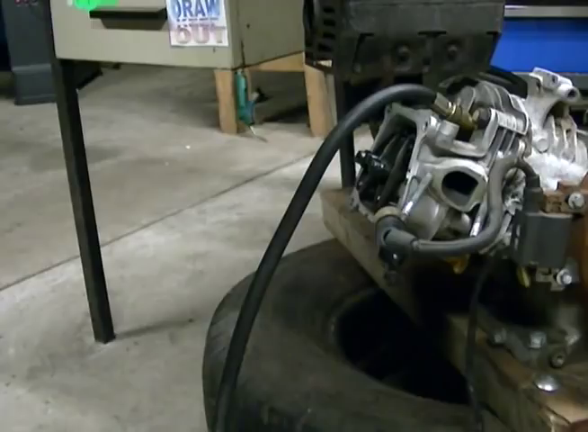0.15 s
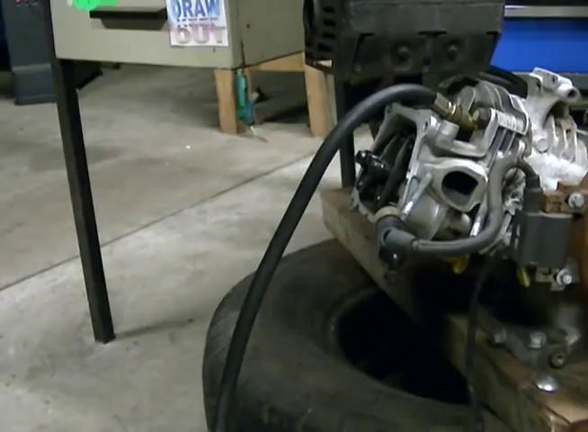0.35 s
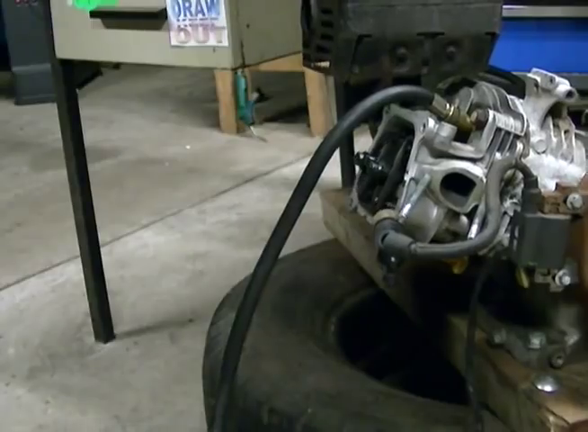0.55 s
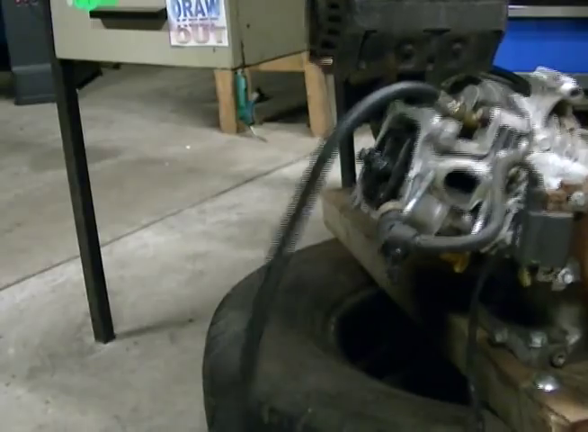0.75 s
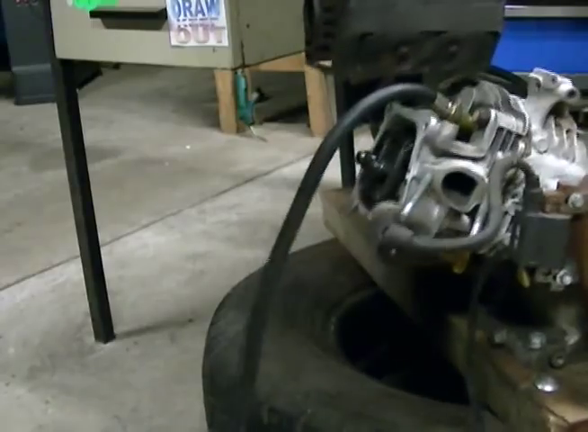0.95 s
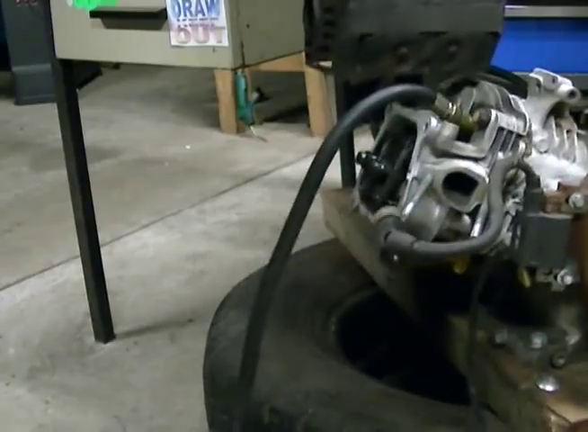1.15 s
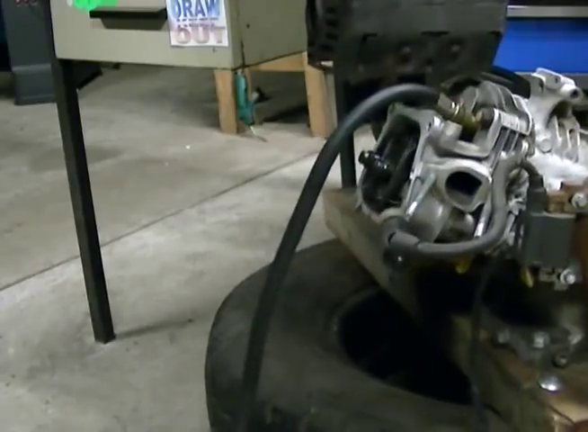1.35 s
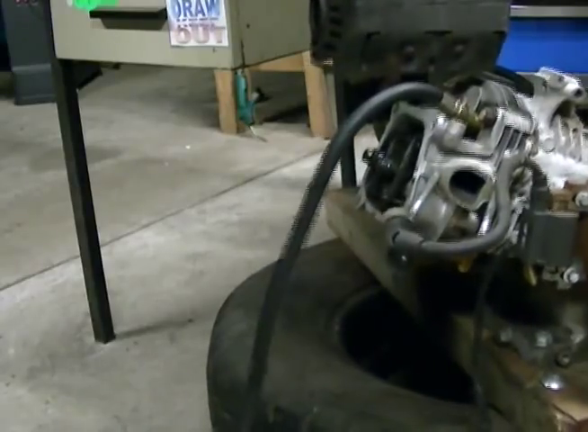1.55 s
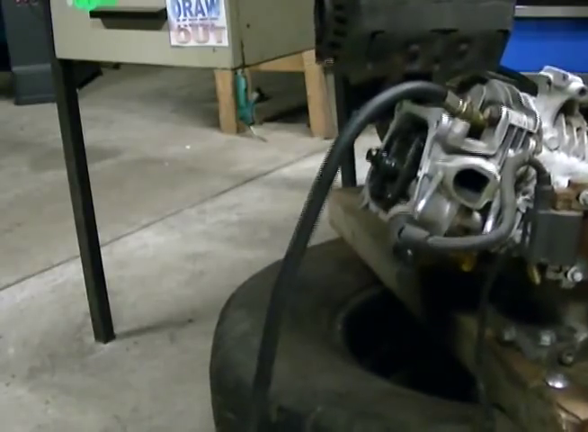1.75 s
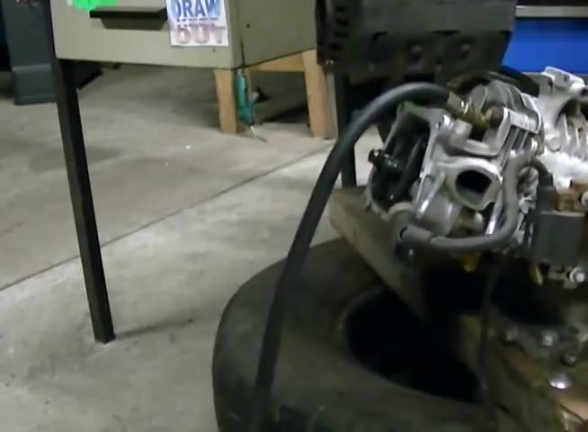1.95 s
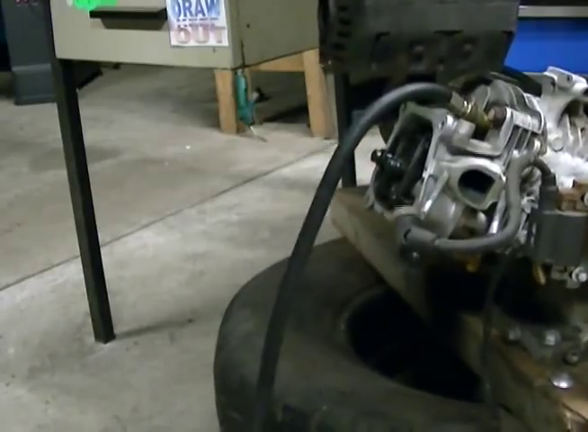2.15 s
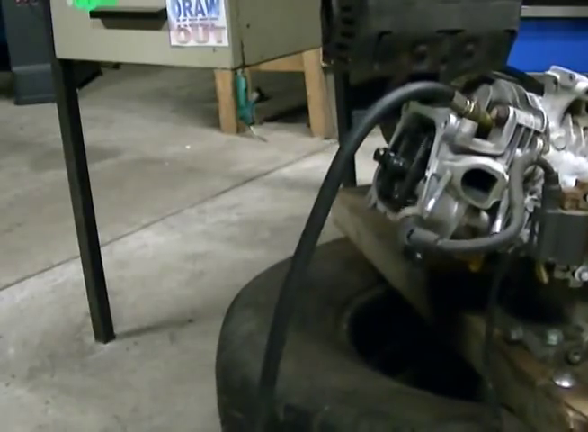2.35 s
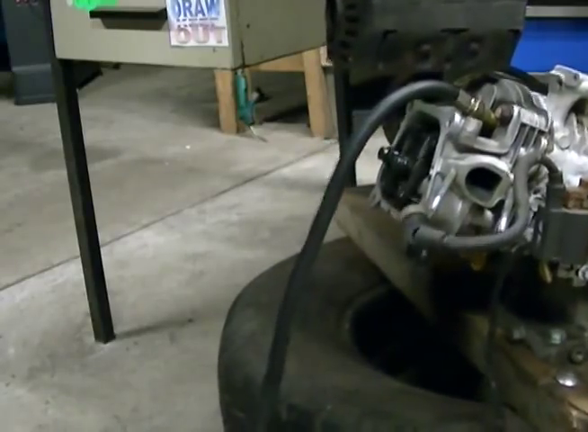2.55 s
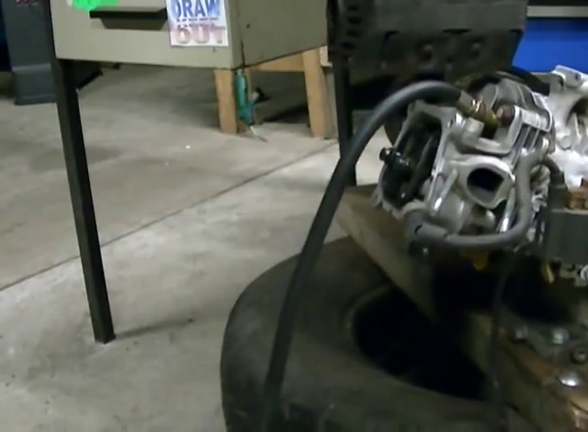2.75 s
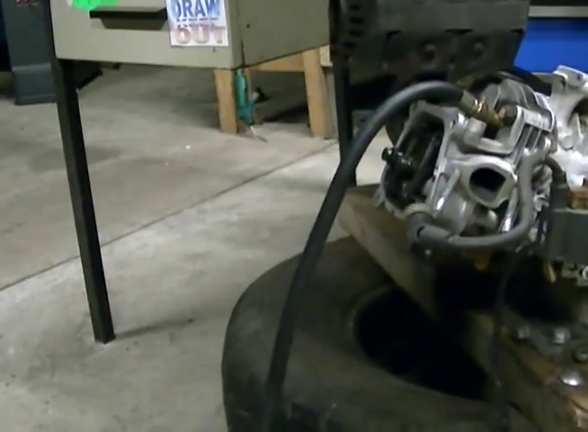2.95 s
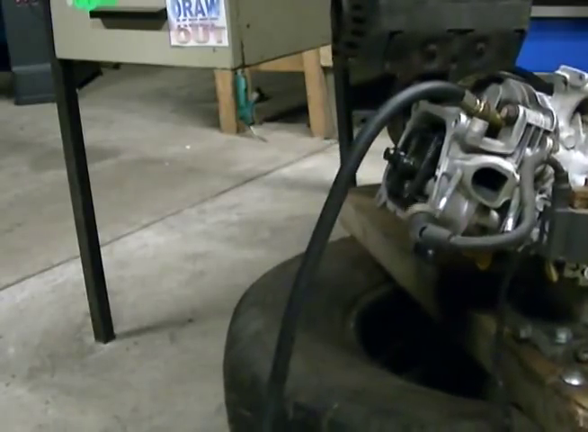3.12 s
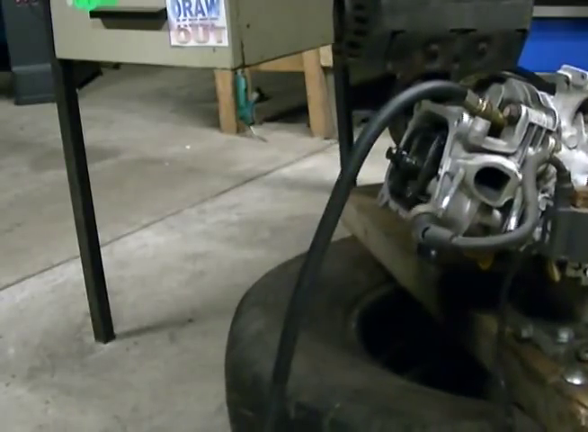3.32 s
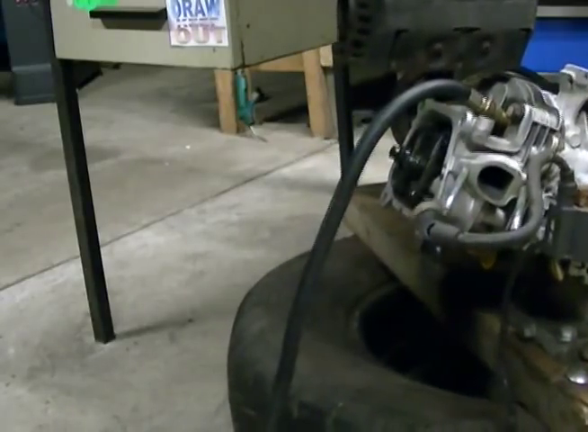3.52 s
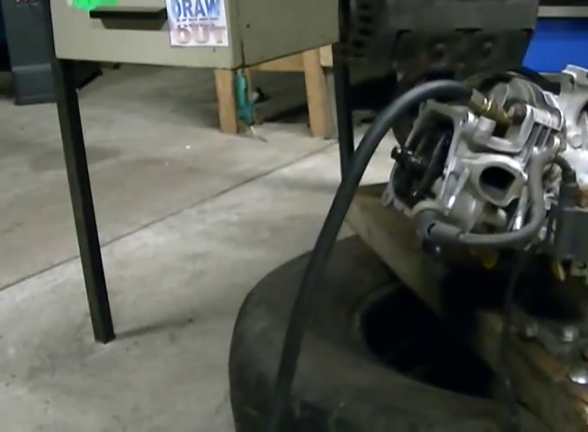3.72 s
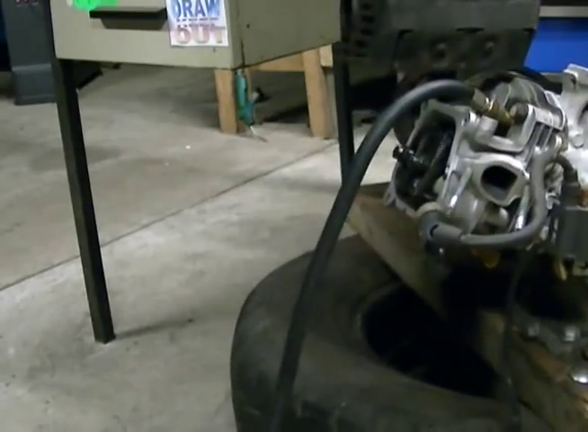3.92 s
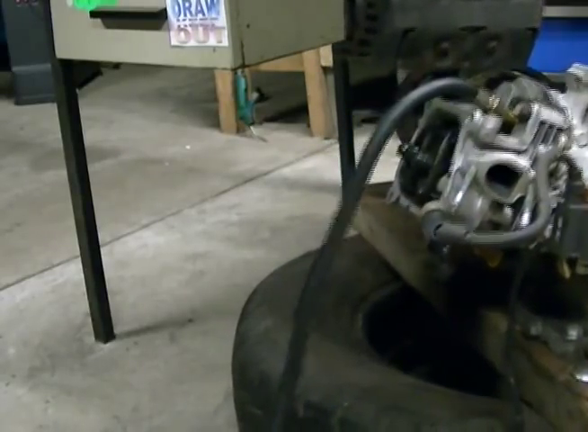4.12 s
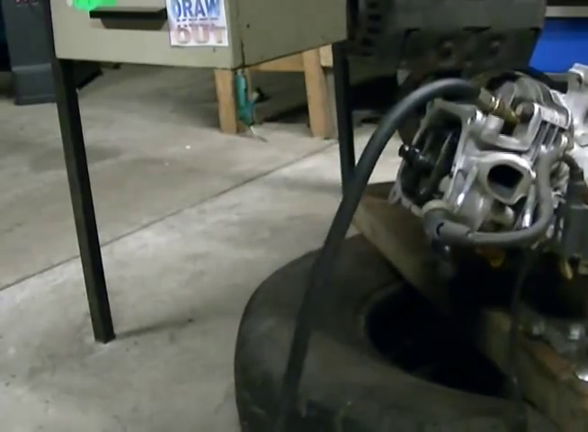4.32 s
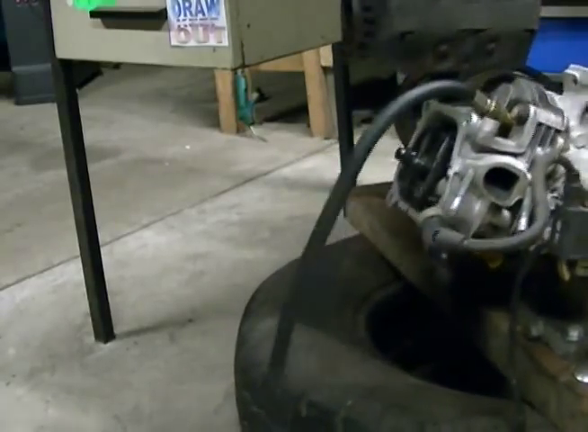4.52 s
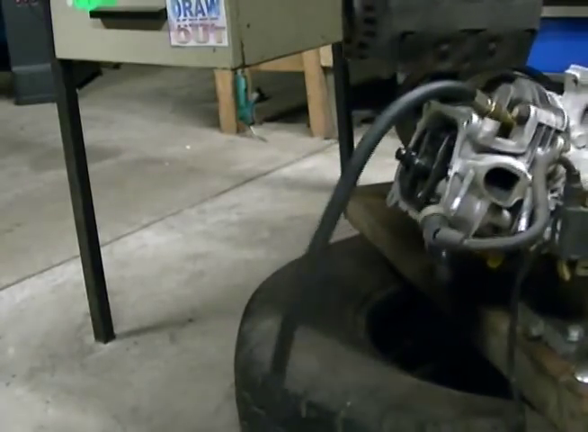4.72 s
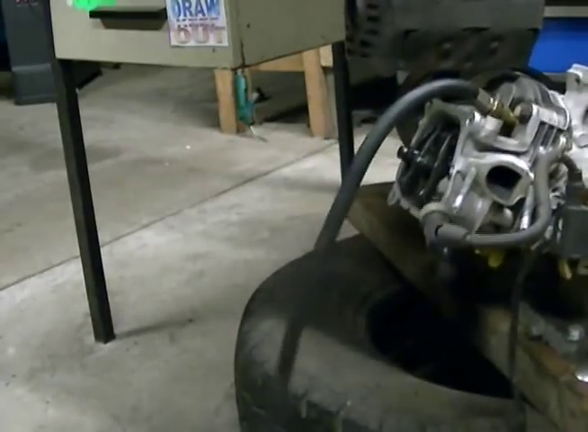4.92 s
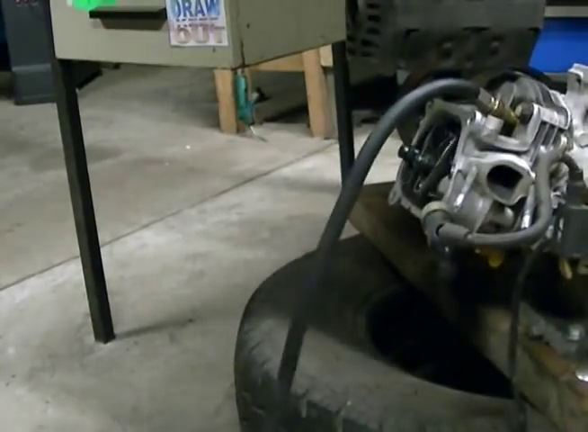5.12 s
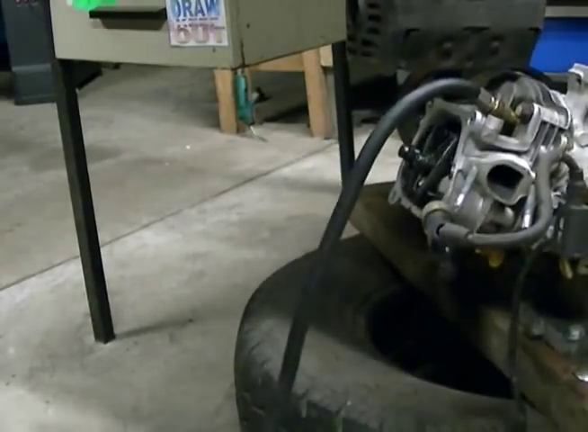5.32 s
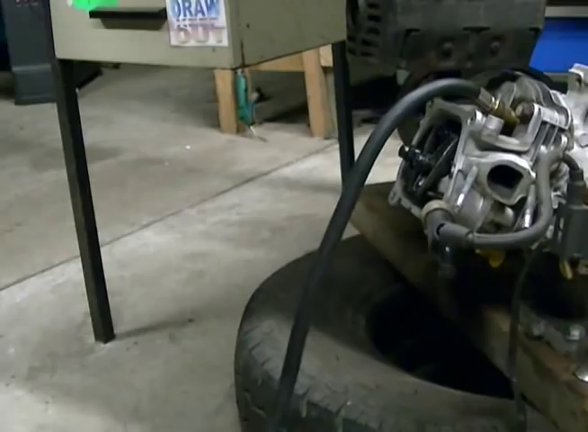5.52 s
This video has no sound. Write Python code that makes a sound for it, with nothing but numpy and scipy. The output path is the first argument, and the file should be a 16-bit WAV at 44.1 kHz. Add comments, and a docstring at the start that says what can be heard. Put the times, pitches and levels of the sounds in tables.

```python
"""In a workshop, an electric starter cranks a small single-cylinder engine that never fires.
The turning crank times it all: noise swells for gear rasp, struck resonances for knock and valve clacks,
wavering tones for squeaks, body hum and air throbs, and coloured noise for the rush through the ports.
The starter is released, the crank coasts against compression, and loose gears clunk to rest as noise
cracks and ringing sines. Metal sounds get a short room tail; a faint room tone lies under everything."""
import sys
import numpy as np
from scipy import signal
from scipy.fft import rfft, irfft, next_fast_len
from scipy.io import wavfile

SR = 44100
rng = np.random.default_rng(int(sys.argv[2]) if len(sys.argv) > 2 else 0)


def waveform_to_disk(signal):
    """Save audio, clipped to [-1, 1], as 16-bit WAV at the path in sys.argv[1]."""
    frames = np.transpose(np.atleast_2d(signal))
    scaled = np.clip(frames, -1, 1) * 32767
    samples = np.round(scaled).astype(np.int16)
    wavfile.write(sys.argv[1], SR, samples)


N = 249849
TIME = np.arange(N) / SR


def amp(db):
    """Turn decibels into a linear factor."""
    return 10 ** (np.asarray(db) / 20)


def unit(x):
    """Scale to rms 1."""
    return x / np.sqrt(np.mean(x ** 2) + 1e-20)


def hump(x, centre, width):
    """Bell-shaped swell of height 1."""
    return np.exp(-.5 * ((x - centre) / width) ** 2)


def each_cycle(cycles, share, width):
    """A swell that comes back at the same crank angle."""
    return hump((cycles - share + .5) % 1, 0.5006, width)


def passing(cycles, share):
    """Times at which the crank passes a point (or points) of its cycle."""
    points = np.add.outer(np.arange(np.ceil(cycles[-1])), share).ravel()
    # points never reached land beyond the end
    return np.interp(points, cycles, TIME, right=2 * N / SR)


def wander(rate):
    """Random drift of spread 1, with `rate` new values a second."""
    return unit(np.interp(TIME * rate, np.arange(N // 20), rng.standard_normal(N // 20)))


def clicks(times, sizes):
    """Single-sample blows; those after the end are dropped."""
    samples = np.round(np.asarray(times) * SR).astype(int)
    return np.bincount(np.clip(samples, 0, N), sizes * np.ones(len(times)), N)[:N]


def bursts(blows, t60):
    """Loudness of the chatter after each blow; its energy equals the blow's."""
    r = np.exp(-2 * np.log(1000) / (t60 * SR))
    return np.sqrt(signal.lfilter([1 - r], [1, -r], blows ** 2 + 1e-18))


def colour(x, spectrum):
    """Shape by a smooth spectrum, keeping the power of white noise."""
    hz, db = np.transpose(spectrum)
    size = next_fast_len(len(x) + 2048)
    grid = np.maximum(np.fft.rfftfreq(size, 1 / SR), 1)
    gain = unit(amp(np.interp(np.log(grid), np.log(hz), db)))
    return irfft(rfft(x, size) * gain, size)[:len(x)]


def resonate(x, hz, width_hz):
    """Band-pass resonance with gain 1 on top."""
    r = np.exp(-np.pi * width_hz / SR)
    zeros = np.array([1, 0, -1]) * (1 - r * r) / 2
    poles = [1, -2 * r * np.cos(2 * np.pi * hz / SR), r * r]
    return signal.lfilter(zeros, poles, x + 1e-18)


def ring(x, hz, t60):
    """A unit click sets a dying sine of starting height 1 ringing."""
    r = np.exp(-np.log(1000) / (t60 * SR))
    w = 2 * np.pi * hz / SR
    return signal.lfilter([0, np.sin(w)], [1, -2 * r * np.cos(w), r * r], x + 1e-18)


def swells(cycles, rows, waver, chance_db):
    """Wavering tones that come back at the same crank angle."""
    out = np.zeros(N)
    for share, length, hz, db in rows:
        pitch = hz * (1 + waver * wander(250))
        tone = np.sin(2 * np.pi * np.cumsum(pitch) / SR)
        out += amp(db + chance_db * wander(7)) * each_cycle(cycles, share, length) * tone
    return out


# quiet of the room, shape only: (f/Hz, relative level/dB)
ROOM_TONE_SPECTRUM = [(18, -90), (30, -52), (108, -30), (126, -16.5), (144, -11.5), (182, -18.5),
                      (230, -13.5), (561, -13.5), (874, -16.5), (1360, -20.5), (15500, -33.5)]


def room_tone():
    """Steady noise with a low bulge is the quiet of the workshop."""
    return amp(-60) * colour(rng.standard_normal(N), ROOM_TONE_SPECTRUM)


# the starter spins the crank up towards its top speed (cycles per s)
START_S, START_SPEED, TOP_SPEED, SPIN_UP_S = .437, 2.319, 6.439, .609
RELEASE_S, COAST_S = 4.007, .793   # once released, friction slows the crank evenly
START_ANGLE = -.223   # cycles before the first knock
# compression holds the slow crank back, or springs it forward (negative):
# (t/s, width/s, share of speed lost)
COMPRESSION_SAGS = [(.585, .025, -.37), (.74, .075, .453), (4.162, .024, .227)]


def crank():
    """Engine cycles turned since the first knock, and speed as a share of the top speed."""
    spin_up = TOP_SPEED - (TOP_SPEED - START_SPEED) * np.exp(-(TIME - START_S) / SPIN_UP_S)
    coast = np.clip(1 - (TIME - RELEASE_S) / COAST_S, 0, 1)
    held_back = 1 - sum(lost * hump(TIME, s, width) for s, width, lost in COMPRESSION_SAGS)
    speed = (TIME > START_S) * spin_up * coast * held_back
    return START_ANGLE + np.cumsum(speed) / SR, speed / TOP_SPEED


# blows of gears and loose parts at start and stop, before the trims in clunks():
# (t/s, body level/dB, sharp edge level/dB)
CLUNK_BLOWS = [(0.1, -45, -64), (0.438, -11.5, -36), (0.516, -5.5, -12.5), (4.489, -4.5, -43),
               (4.505, -13, -41), (4.52, -12, -28), (4.554, -13, -25), (4.566, -17, -46),
               (4.598, -16, -16.5), (4.885, -15, -52), (4.961, -6.5, -26), (5.153, -29, -35.5),
               (5.31, -34.5, -66.5), (5.583, -36, -47), (5.64, -31, -48)]
# colour of the crack, shape only: (f/Hz, relative level/dB)
CRACK_SPECTRUM = [(59, -69), (100, -46), (570, -15), (748, -4.5), (1460, -11), (1700, -10), (2000, -13.5),
                  (2470, -7.5), (4450, -20), (11400, -41.5), (15000, -60)]
# ringing of the steel gears: (f/Hz, relative level/dB, decay time t60/s)
GEAR_RINGS = [(735, -14.5, .33), (1313, -7.5, 0.45), (1694, -4, 0.35), (2250, -14, 0.43), (2500, 0.5, 0.19),
              (2580, -24, .38), (2920, -7, 0.35), (4100, -15.5, 0.12), (4430, -6, 0.22), (5740, -18, 0.26)]
# colour of sliding metal, also used by gears(), shape only: (f/Hz, relative level/dB)
SLIDING_SPECTRUM = [(500, -34.5), (1500, -8.5), (3500, -3), (5000, -4), (6300, -2.5), (8500, -5.5),
                    (12000, -8.5), (14000, -15.5), (15700, -30.5)]


def clunks(crack_db=11, ring_db=-24, body_db=2, sharp_db=8, rebound_s=0.0051, rebound_db=2,
           crack_t60=0.064, edge_t60=0.06, shudder_db=-10, shudder_t60=0.9):
    """Backlash blows: a short crack, a longer shudder, and the steel gears ring on; heavy blows rebound."""
    s, db, edge_db = np.transpose(CLUNK_BLOWS)
    size = amp(db + body_db)
    # squared size: heavy blows rebound far more than light ones
    blows = clicks(s, size) + clicks(s + rebound_s, amp(rebound_db) * size ** 2)
    loudness = bursts(blows, crack_t60) + amp(shudder_db) * bursts(blows, shudder_t60)
    body = loudness * rng.standard_normal(N)
    edge = bursts(clicks(s, amp(edge_db + sharp_db)), edge_t60) * rng.standard_normal(N)
    edge = signal.sosfilt(signal.butter(2, 4500, "high", fs=SR, output="sos"), edge)
    crack = colour(body, CRACK_SPECTRUM) + colour(edge, SLIDING_SPECTRUM)
    rings = sum(amp(mode_db) * ring(clicks(s, size), hz, t60) for hz, mode_db, t60 in GEAR_RINGS)
    return amp(crack_db) * crack + amp(ring_db) * rings


DRIVEN_POWER, COAST_POWER = 0.62, 1.24   # gear force grows as a power of speed, under power and coasting
BITE_S, FREE_SPIN_DB = 0.56, -8   # the pinion whirrs lightly until it bites
# teeth bear harder or go slack as the slow crank fights compression: (t/s, width/s, level change/dB)
TOOTH_STRAINS = [(.64, 0.0099, 3.5), (.72, 0.019, -7.5), (4.215, 0.038, 2), (4.41, 0.013, -4.5),
                 (4.448, 0.015, -1.5)]


def gear_force(speed):
    """Force on the teeth follows speed: light before the pinion bites, fading sooner after release."""
    power = np.where(TIME < RELEASE_S, DRIVEN_POWER, COAST_POWER)
    strain_db = sum(db * hump(TIME, s, width) for s, width, db in TOOTH_STRAINS)
    return speed ** power * amp(FREE_SPIN_DB * (TIME < BITE_S) + strain_db)


def teeth(cycles, count, uneven_db, chance_db, t60, repeat=0.7):
    """Worn teeth strike in the same uneven pattern every cycle, each with a short chatter; rms 1."""
    spacing = np.arange(count) + rng.uniform(-.4, .4, count)
    times = passing(cycles, spacing / count)
    wear = np.resize(rng.permutation(np.linspace(-1.7, 1.7, count)), len(times))
    strikes = clicks(times, amp(uneven_db * wear + chance_db * rng.standard_normal(len(times))))
    # part of the grain comes back in each cycle, as the same surfaces meet again
    since_knock = np.arange(N) - np.searchsorted(cycles, np.floor(cycles))
    grain = repeat * rng.standard_normal(N)[since_knock] + rng.standard_normal(N)
    return unit(bursts(strikes, t60) * grain)


# load surges in each cycle: (share of cycle, width/cycles, rattle level/dB, slide level/dB), both relative
LOAD_SURGES = [(.98, 0.028, 3.5, 5), (.07, .04, 1, -7), (.19, 0.034, 1.5, 2.5), (0.408, 0.029, -0.5, -4),
               (.478, 0.055, -11.5, 7.5), (.695, 0.039, 3, 4)]
SLACK_RATTLE_DB, SLACK_HISS_DB = -5.5, -13.5   # relative levels between the surges
# colour of the tooth rattle, also used by rubbing(), shape only: (f/Hz, relative level/dB)
TOOTH_SPECTRUM = [(30, -32.5), (100, -23), (280, -20), (460, -13), (650, -1.5), (1200, 0), (1850, -4.5),
                  (2300, -1), (4300, -3), (5000, -11), (6500, -8), (10000, -15), (15500, -48)]


def gears(cycles, drive, teeth_db=-20, grind_db=-24.0, hiss_db=-26, ticks_db=-25,
          flicker_db=0.84, hiss_growth=1.9):
    """Teeth strike and slide as hard as the load demands; hiss grows faster with force than rattle."""
    rattle, slide = amp(SLACK_RATTLE_DB), amp(SLACK_HISS_DB)
    for share, width, rattle_db, slide_db in LOAD_SURGES:
        surge = each_cycle(cycles, share, width)
        rattle = np.hypot(rattle, amp(rattle_db) * surge)
        slide = np.hypot(slide, amp(slide_db) * surge)
    rattle, slide = drive * rattle, drive ** hiss_growth * slide
    strikes = amp(teeth_db) * teeth(cycles, count=132, uneven_db=2.5, chance_db=2, t60=0.014)
    ticks = amp(ticks_db) * teeth(cycles, count=60, uneven_db=-2.5, chance_db=5.5, t60=0.058)
    grind = amp(grind_db) * rng.standard_normal(N) * amp(flicker_db * wander(500))
    hiss = amp(hiss_db) * rng.standard_normal(N) * amp(flicker_db * wander(810))
    rasp = colour((strikes + grind) * rattle, TOOTH_SPECTRUM)
    return rasp + colour((hiss + ticks) * slide, SLIDING_SPECTRUM)


# resonances of the engine casing: (f/Hz, width/Hz, level/dB against the direct sound)
CASING_MODES = [(546, 27, -2), (598, 21, -9), (787, 33, -5.5), (984, 100, -8.5), (1314, 46, -7),
                (1500, 83, -2.5), (1684, 38, 3.5), (2340, 118, 1), (2946, 93, -15.5), (2990, 77, -3),
                (3610, 42, -6), (3910, 100, -12), (4257, 114, 0), (5760, 100, 1.5), (6200, 120, -8),
                (7140, 120, -26)]


def casing(x):
    """The casting lifts its own resonances out of whatever shakes it."""
    return x + sum(amp(db) * resonate(x, hz, width) for hz, width, db in CASING_MODES)


SINGING_DB, SINGING_POWER = 1.5, 1.5   # trim on squeaks and hum, and extra growth with speed
# rubbing parts sing briefly, and the engine body hums long and low near 531 Hz:
# (share of cycle, width/cycles, f/Hz, relative level/dB)
SQUEAK_AND_HUM_TONES = [(.1, 0.022, 2080, -12), (.12, .04, 3940, -26), (.43, 0.044, 4340, -30),
                        (.68, 0.18, 531, -31.5)]


def squeaks_and_hum(cycles, speed, vigour):
    """Rubbing parts sing briefly and the body hums longer and lower: wavering sines at fixed crank angles."""
    level = amp(SINGING_DB) * vigour * speed ** SINGING_POWER
    return level * swells(cycles, SQUEAK_AND_HUM_TONES, waver=.013, chance_db=3.0)


PORT_LEAK_DB, AIR_POWER = -49, 2.14   # flow between the gusts before the speed factor, and growth with speed
# gas rushes through the open ports twice a cycle: (share of cycle, width/cycles, level/dB before speed)
GAS_RUSHES = [(0.069, .06, -35.5), (.745, 0.11, -34.5)]
# colour of the rush, shape only: (f/Hz, relative level/dB)
RUSH_SPECTRUM = [(30, -13.5), (110, -15), (200, -2.5), (330, -2.5), (460, 2), (750, -13), (2000, -55.5)]
# hollow throbs of air: (share of cycle, width/cycles, f/Hz, level/dB before speed)
AIR_THROBS = [(0.022, 0.02, 200, -33.5), (.6, 0.038, 175, -32.5), (.72, .03, 160.7, -35),
              (0.831, 0.048, 168, -32.5)]


def ports(cycles, speed):
    """The piston pumps air through the open head: hollow throbs on a dull rush."""
    gusts = sum(amp(db) * each_cycle(cycles, share, width) for share, width, db in GAS_RUSHES)
    rush = (amp(PORT_LEAK_DB) + gusts) * colour(rng.standard_normal(N), RUSH_SPECTRUM)
    return speed ** AIR_POWER * (rush + swells(cycles, AIR_THROBS, waver=0.0645, chance_db=-1.5))


# soft thumps as the engine starts and settles: (t/s, f/Hz, level/dB before softening)
SOFT_THUMPS = [(0.446, 178, -32), (0.783, 197, -32), (4.101, 155, -24), (4.378, 230, -25),
               (4.761, 150, -42), (5.333, 274, -55), (5.636, 332, -39)]


def thumps(t60=0.054, soft_hz=45):
    """Dull puffs and bumps: short low sines whose onset a resonance softens."""
    return sum(resonate(ring(clicks([s], amp(db)), hz, t60), hz, soft_hz) for s, hz, db in SOFT_THUMPS)


KNOCK_DB, KNOCK_POWER = -1.5, 2.3   # one knock a cycle: level at top speed, and growth with speed


def knock(cycles, speed, hz=705, width_hz=400, lead_s=0.00147, chance_db=1.1, echo_db=-12, echo_s=0.017):
    """A heavy, well-damped blow once a cycle, harder with speed, with its echo off the floor."""
    s = passing(cycles, 0) - lead_s
    size = amp(KNOCK_DB + chance_db * rng.standard_normal(len(s)))
    size = size * np.interp(s, TIME, speed) ** KNOCK_POWER
    blows = clicks(s, size) + clicks(s + echo_s, size * amp(echo_db))
    thud = resonate(resonate(blows, hz, width_hz), hz, width_hz)
    # bring the peak of the doubled resonance back to about the blow's size
    return thud * SR / width_hz * np.e / (2 * np.pi)


# valve gear contacts in each cycle: (share of cycle, f/Hz, width/Hz, level/dB at full vigour)
VALVE_CONTACTS = [(.02, 2450, 1490, -11.5), (.071, 654, 131, -26), (.205, 980, 143, -27),
                  (0.388, 996, 299, -19), (0.516, 1049, 458, -4), (0.523, 4610, 249, -12.5),
                  (0.733, 900, 400, -13.5), (0.916, 941, 248, -12.5), (.975, 5920, 500, -9.5),
                  (.975, 7900, 6000, -1)]


def valve_gear(cycles, vigour, chance_db=2, chatter=1.0, chatter_t60=0.011):
    """Rockers and valves land at fixed crank angles, each with a short chatter."""
    out = np.zeros(N)
    for share, hz, width, db in VALVE_CONTACTS:
        times = passing(cycles, share)
        blows = vigour * clicks(times, amp(db + chance_db * rng.standard_normal(len(times))))
        bounce = chatter * bursts(blows, chatter_t60) * rng.standard_normal(N)
        out += resonate(blows + bounce, hz, width) * SR / (2 * np.pi * width)
    return out


# faint rubbing as things settle: (t/s, width/s, level/dB before grain)
SETTLING_RUBS = [(4.87, 0.063, -43.5), (5.5, .045, -55.5), (5.621, 0.021, -43)]


def rubbing():
    """Soft, grainy scrapes of metal on metal: flickering noise under brief pressure."""
    pressure = sum(amp(db) * hump(TIME, s, width) for s, width, db in SETTLING_RUBS)
    grains = rng.standard_normal(N) * amp(1.5 * wander(400))
    return pressure * colour(grains, TOOTH_SPECTRUM)


def tail(x, t60):
    """Smear each blow into dying noise of the same energy."""
    decay = rng.standard_normal(SR) * np.exp(-np.log(1000) * TIME[:SR] / t60)
    return signal.fftconvolve(x, decay / np.linalg.norm(decay))[:N]


def workshop(x, wet_db=-10, t60=0.65, delay_s=.009, dull_hz=7000):
    """Concrete floor and walls return a short, slightly dull tail."""
    wet = signal.sosfilt(signal.butter(1, dull_hz, fs=SR, output="sos"), tail(x, t60))
    return x + amp(wet_db) * np.interp(TIME - delay_s, TIME, wet, left=0)


def scene():
    """The engine and its room, over the quiet of the workshop."""
    cycles, speed = crank()
    drive = gear_force(speed)
    vigour = drive ** 2   # valve clacks, squeaks and hum fade faster than the rattle
    metal = clunks() + casing(gears(cycles, drive)) + squeaks_and_hum(cycles, speed, vigour)
    metal = metal + knock(cycles, speed) + valve_gear(cycles, vigour)
    air = ports(cycles, speed) + thumps()
    return (room_tone() + workshop(metal) + air + rubbing())[None]


CUTOFF_HZ = 15700


def record(dry):
    """The highest peaks are rounded, and the top is cut by a steep low-pass."""
    rounded = dry / (1 + (dry / .93) ** 4) ** .25
    return signal.sosfilt(signal.ellip(10, .2, 80, CUTOFF_HZ, fs=SR, output="sos"), rounded)


dry = scene()
out = record(dry)
waveform_to_disk(out)
```